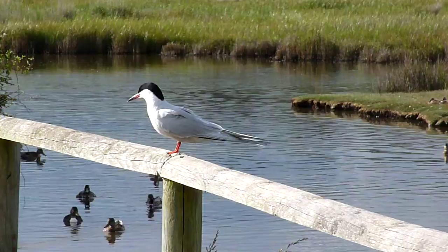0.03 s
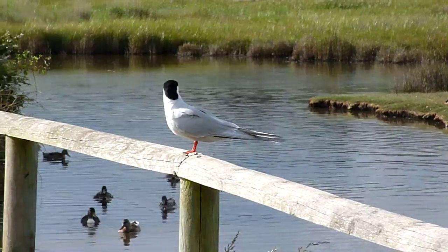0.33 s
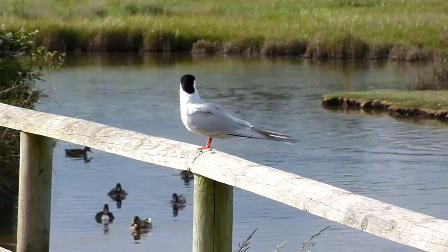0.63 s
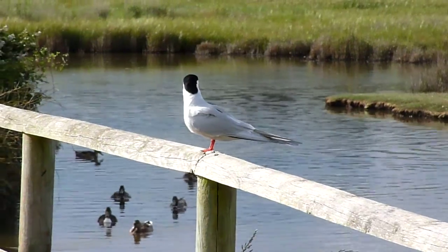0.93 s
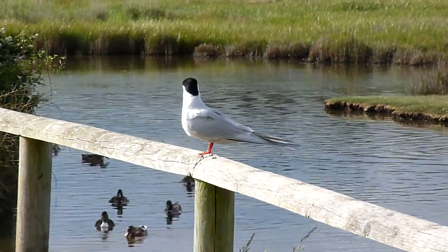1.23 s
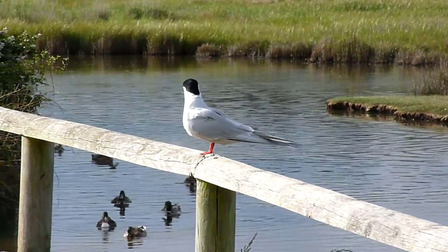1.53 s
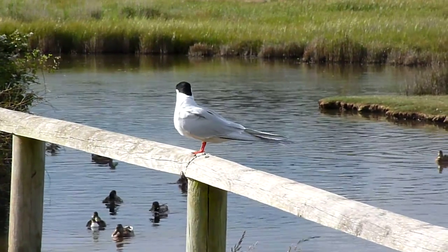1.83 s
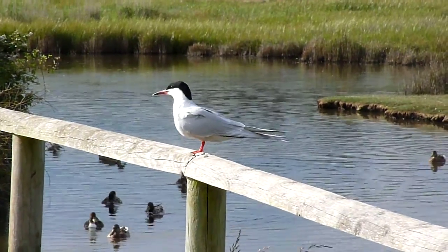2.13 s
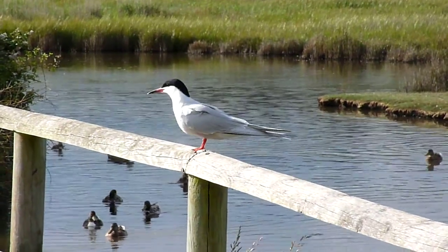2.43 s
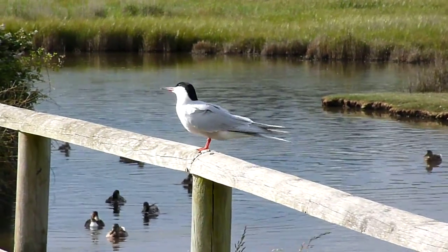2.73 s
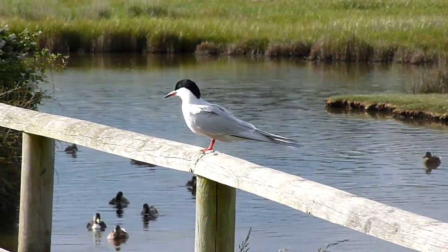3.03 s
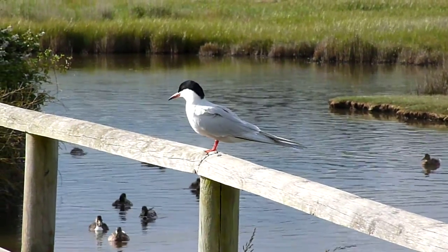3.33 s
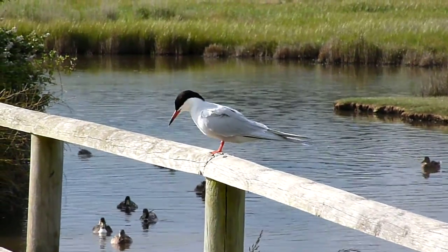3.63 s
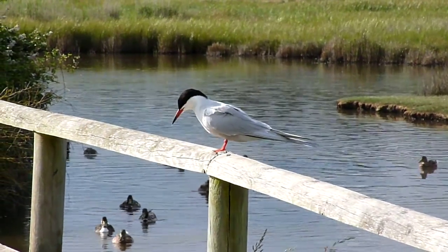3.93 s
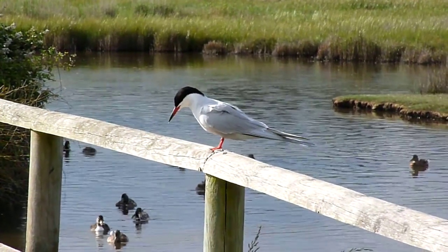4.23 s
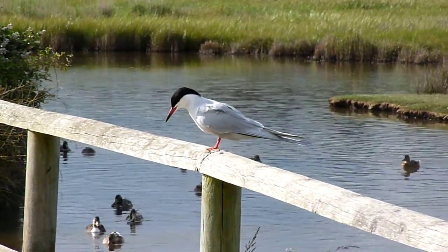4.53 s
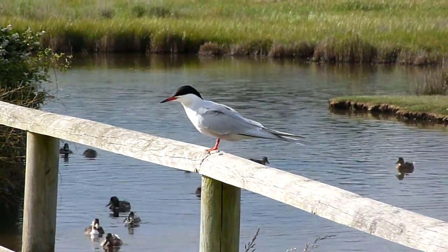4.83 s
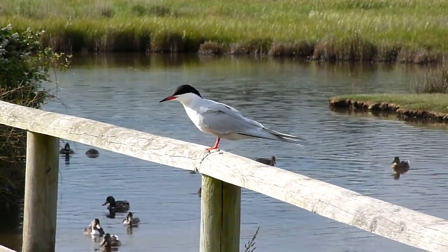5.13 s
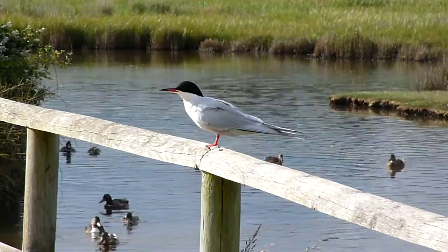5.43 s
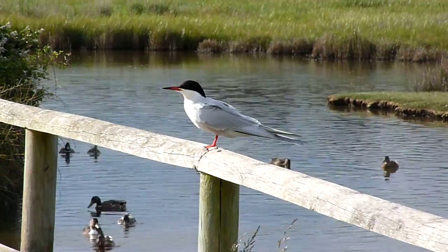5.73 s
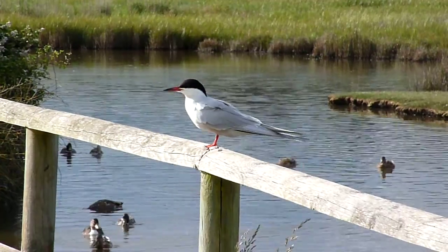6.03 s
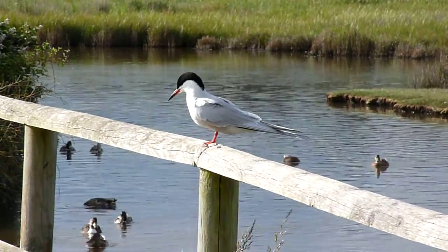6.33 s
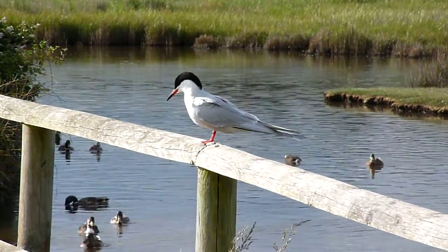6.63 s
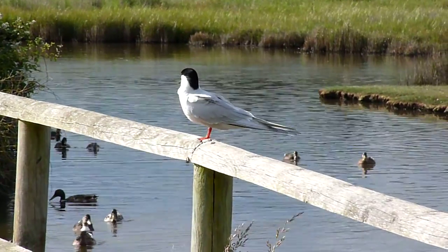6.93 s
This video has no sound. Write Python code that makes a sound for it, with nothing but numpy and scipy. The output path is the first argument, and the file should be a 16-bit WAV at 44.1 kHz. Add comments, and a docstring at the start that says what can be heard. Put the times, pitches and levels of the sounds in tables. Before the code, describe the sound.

Uneven wind buffets the microphone with low rumbling and light crackles, over faint, raspy cries of distant gulls and terns.

```python
"""Beside a pond, gusty wind buffets a microphone; the sound starts about half a second in.
Turbulent pressure rumbles at the port, and hard eddies thump it and make it crackle.
Gulls and terns call across the water, each syrinx a source filtered by throat resonances,
over the hiss of wind in marsh grass. A motor hums briefly near the start; later comes one sharp tick."""
import sys
import numpy as np
from scipy import signal
from scipy.fft import rfft, irfft, next_fast_len
from scipy.io import wavfile
from scipy.ndimage import uniform_filter1d, map_coordinates

SR = 44100
rng = np.random.default_rng(int(sys.argv[2]) if len(sys.argv) > 2 else 0)


def master_out(mix):
    """Clip the mix to full scale and print it as 16-bit PCM to the path in sys.argv[1]."""
    frames = np.transpose(np.atleast_2d(mix))
    ceiling = np.clip(frames, -1, 1)
    pcm = np.round(ceiling * 32767).astype(np.int16)
    wavfile.write(sys.argv[1], SR, pcm)


N = 316197
TIME = np.arange(N) / SR

# The breeze between gusts. Each row: time in seconds, relative level in dB.
BREEZE_LEVELS = [(0.57, -32), (1.3, -29), (1.55, -29.5), (2.05, -32.0), (2.21, -37.5), (2.5, -33),
                 (2.86, -32), (3.04, -35.5), (3.14, -41), (3.5, -30), (3.71, -37), (3.88, -37.0),
                 (4.21, -37), (4.7, -33.5), (5.02, -37), (5.4, -33.5), (7.08, -34), (7.17, -49)]
# Gusts at the port. Each row: start in seconds, length in seconds, relative level in dB,
# rumble and flutter against that level in dB.
PORT_GUSTS = [(.59, .11, -26, -2, -18), (0.782, 0.099, -25, -4, -15), (1.019, 0.036, -26.5, -5.5, -8),
              (1.08, .092, -32.5, -19, -5), (1.179, 0.072, -21, -4, -16), (1.339, .13, -28, -5, -13.5),
              (1.662, 0.085, -26.5, -6, -14), (1.893, 0.058, -23, -5.5, -14), (1.984, 0.054, -27, -13, -9),
              (2.114, 0.046, -25, 6.5, -9), (2.251, .14, -33.5, 3.5, -17), (2.573, .1, -24, -2.5, -12),
              (2.686, .16, -26.5, -4.5, -7), (2.891, .13, -24, -4.5, -16), (3.17, .14, -25.5, 1.5, -11),
              (3.316, 0.099, -26.5, -7, -13), (3.538, 0.048, -25, -4, -8), (3.64, 0.036, -26, -0.5, -7),
              (3.73, 0.16, -28, -0.5, -11), (3.903, 0.1, -24.5, -10, -13), (4.017, .15, -27, -7.5, -16),
              (4.281, 0.029, -26, -3, -14), (4.442, 0.021, -29, -21, -8), (4.63, 0.0351, -27, -3.5, -13),
              (4.697, .163, -26.5, -9, -20), (5.063, 0.059, -26, -2, -12), (5.151, .121, -27.5, -0.5, -9),
              (5.356, 0.12, -26.5, -7, -13), (5.471, 0.096, -24.5, -3, -7), (5.571, .31, -22, -11, -8),
              (5.88, .21, -24, -6.5, -7), (6.185, 0.12, -27.5, -4, -7), (6.308, .17, -23.5, -8.5, -8.5),
              (6.514, .1, -27, -9, -9), (6.673, .12, -26.5, -4, -10.5), (6.873, .17, -23.5, -7, -9)]
# Pressure spectrum of the turbulence at typical speed. Each row: frequency in Hz, relative level in dB.
EDDY_SPECTRUM = [(15, -18), (30, -4.5), (55, 7.5), (115, 7.5), (190, 1.5), (300, -6.5), (450, -20),
                 (700, -34.5), (1100, -51.5), (2000, -76), (4000, -81.5), (10000, -115)]
# The swell of the hiss in the grass. Each row: time in seconds, relative level in dB.
GRASS_LEVELS = [(.57, -56), (.9, -60.5), (1.52, -53), (1.8, -54), (1.92, -62), (2.25, -67.5), (2.55, -58),
                (2.8, -67.5), (3.19, -59.5), (3.3, -66.5), (4.28, -62), (4.45, -55), (4.85, -63.5),
                (5.38, -57), (5.55, -68.5), (6.35, -63.5), (7.17, -67.5)]
# Spectrum of that hiss. Each row: frequency in Hz, relative level in dB.
GRASS_SPECTRUM = [(300, 7.5), (700, 15), (1100, 7.5), (1650, 6), (2200, -2), (3000, -6.5), (4500, -12),
                  (5500, -17.5), (6500, -22.5), (8000, -63)]
# Response of a bird's throat. Each row: frequency in Hz, gain in dB.
THROAT_RESPONSE = [(1000, -24.5), (1600, 0), (2200, 2), (3100, 0), (3900, -3), (4600, -4.5), (5300, -11.5),
                   (6200, -19), (9000, -72.5)]
# Notes of the gull cries. Each row: start, length, climb and fall in seconds; first, crest and end pitch
# in Hz; relative level in dB; offset of the upper resonance at the crest and after the fall in dB;
# brightness of the lower resonance in dB; trill rate in Hz; trill depth at the crest and after the fall,
# 0 to 1; rasp, 0 to 1.
GULL_NOTES = [(0.552, 0.13, 0.013, 0.045, 1492, 1500, 1471, -49.5, 0.5, -8.5, 2, 168, 0.57, 0.76, 0.99),
              (0.689, 0.16, 0.0045, 0.089, 1100, 1101, 1060, -55, -4, -5.5, 5, 65, 0.87, 0.96, 1),
              (0.842, 0.17, 0.077, 0.049, 1006, 1035, 1015, -56, -16, -18, 16, 63.7, 1, 1, 0.57),
              (1.096, 0.16, 0.0047, 0.1, 1570, 1580, 1446, -52, -2.5, -15, 2, 72, 0.78, 0.6, 0.66),
              (1.376, 0.18, .13, 0.036, 1618, 1697, 1680, -58, -11, -1, -4, 59, .25, 0.3, 0.28),
              (1.538, 0.16, 0.0098, 0.098, 1586, 1592, 1460, -53.5, -4, -11, 0, 61, 0.55, 0.7, 0.97),
              (3.38, 0.056, 0.026, 0.028, 1460, 1526, 1495, -65.5, -5, -3, 5, 55.5, 0.14, 0.14, 0.32),
              (3.419, 0.43, .125, .19, 1475, 1598, 1423, -59.5, -6.5, -15, 8.5, 71.7, 0.16, 0.77, 0.33),
              (4.628, 0.34, 0.061, 0.2, 1154, 1197, 1168, -61.5, -15, -9.5, -8.5, 78.3, .6, 0.67, 0.9),
              (5.001, .11, 0.0047, 0.041, 1762, 1755, 1527, -58.5, -11, -15, -7, 98, 0.2, 0.45, 0.29),
              (5.138, 0.074, .025, .04, 1095, 1190, 1170, -61, 0, -2, -3, 93, .6, 0.57, 0.65),
              (5.206, .13, 0.048, 0.068, 1158, 1206, 1060, -57, -13, -4, 1, 92.4, .65, 0.94, 0.26),
              (5.323, .095, .035, 0.035, 1038, 1091, 1035, -53.5, -7, -7, 2, 100, .95, 1, 0.26),
              (5.404, 0.082, .025, .04, 1050, 1070, 1020, -56.5, -8, -3, -3, 110, .95, 0.96, .55),
              (5.729, 0.073, 0.034, .02, 847.7, 915, 900, -60.5, -5, -6, -6, 88.4, .7, .85, .38),
              (5.786, 0.14, 0.053, 0.041, 956, 1145, 1040, -60, -2, -2.5, -5.5, 86.3, 0.56, 0.75, 0.5),
              (6.226, 0.14, 0.023, 0.077, 1093, 1146, 1030, -59.5, -2, -10.5, -14, 88.6, 0.7, 0.68, 0.55),
              (6.352, 0.098, 0.059, .03, 1013, 1064, 1040, -65, -1, -6, -14, 69, 0.7, 0.83, 0.5),
              (7.111, 0.098, 0.052, 0.019, 1127, 1159, 1163, -59.5, -6.5, -10, -15, 92, 0.5, 0.65, 0.92)]
# Reflections from the banks. Each row: delay in seconds, gain in dB.
BANK_REFLECTIONS = [(0.021, -16), (.041, -24), (.067, -18.5), (.103, -23)]
# Grating calls. Each row: start and length in seconds, relative level in dB,
# first centre, last centre and width of the resonance in Hz.
GRATING_CALLS = [(0.572, 0.115, -56.5, 4620, 4550, 380), (1.447, 0.13, -56.5, 2244, 2240, 260.1),
                 (1.731, 0.09, -54, 1903, 1720, 1385), (2.065, 0.082, -56, 1701, 1551, 900.3),
                 (2.54, 0.052, -65.5, 3790, 3980, 499.6), (3.831, 0.044, -59.5, 2498, 2005, 1102),
                 (3.939, .04, -58.5, 2720, 2102, 1290), (4.067, .072, -55, 3750, 3410, 1689),
                 (4.144, 0.084, -56, 3052, 2742, 911), (4.221, 0.067, -59, 2957, 3160, 997.7)]
# The swell of the motor. Each row: time in seconds, gain in dB.
MOTOR_SWELL = [(.6, -7.5), (1.0, -10), (1.15, 2), (1.7, -3.5), (1.85, -4), (2.0, -56)]
# Partials of the motor. Each row: frequency in Hz, level before the swell in dB.
MOTOR_PARTIALS = [(322, -44), (403.5, -42), (483, -55), (564.5, -49), (705, -56), (963.6, -65)]
# Shrill tern notes. Each row: start and length in seconds, top and last pitch in Hz, level in dB,
# boost of the upper band in dB.
TERN_SQUEAKS = [(1.079, .022, 1808, 1669, -52, 27), (1.299, 0.028, 1628, 1448, -59, 4),
                (2.516, 0.036, 1621, 1698, -68.5, 8), (2.562, .032, 1699, 1479, -57, 6),
                (3.097, .025, 1820, 1801, -70, 9), (6.312, 0.036, 2050, 1750, -69, 13)]
# Harsh, clipped tern notes. Each row: start in seconds, relative level in dB, centre frequency in Hz.
TERN_RATTLES = [(.771, -52, 3913), (1.239, -46.5, 3840), (1.338, -49, 3750), (1.434, -57, 3686),
                (3.628, -61.5, 4200), (3.663, -57.5, 3698), (3.741, -52.5, 3320), (3.893, -65, 4700),
                (4.012, -60, 4738), (6.066, -64, 4567), (6.151, -65, 4415), (6.253, -61, 4090)]
# Single hard eddies. Each row: time in seconds, relative peak in dB, strongest frequency in Hz.
HARD_EDDIES = [(.81, -8, 198), (.825, -10, 200), (.872, -13, 150), (1.024, -12, 259.8), (1.356, -15, 125.1),
               (1.621, -13, 160.1), (1.679, -13, 175), (1.824, -13, 177.7), (1.931, -11, 220.3),
               (1.992, -12, 226.1), (2.143, -11, 252.2), (2.149, -11, 332), (2.596, -9.5, 270),
               (2.701, -18, 320.1), (2.714, -13.5, 170), (2.771, -20.5, 379.5), (2.79, -18, 319.2),
               (2.986, -14, 250.3), (3.094, -13.5, 150.7), (3.209, -13, 240.7), (3.241, -16, 320),
               (3.281, -16.5, 323), (3.389, -11.5, 200), (3.561, -8.5, 220), (3.583, -9, 199.9),
               (3.648, -14.5, 369.1), (3.669, -13, 220.1), (3.975, -15, 160.7), (4.326, -11.5, 229.9),
               (4.574, -9.5, 214.8), (4.649, -13.5, 207.4), (5.08, -7.5, 289.5), (5.113, -11.5, 199.3),
               (5.309, -12.5, 171), (5.486, -10.5, 249), (5.519, -12.5, 320), (5.546, -14.5, 229.7),
               (5.592, -11, 280), (5.688, -13, 279.7), (5.726, -14.5, 249.8), (5.767, -15, 320),
               (5.804, -13, 288), (5.846, -17, 411), (5.908, -11.5, 229.9), (5.986, -12.5, 300.6),
               (6.059, -13.5, 321), (6.136, -11, 190), (6.193, -13.5, 209.9), (6.259, -7.5, 194.6),
               (6.339, -14, 280), (6.361, -11, 159.6), (6.44, -16.5, 319.8), (6.507, -23, 399.6),
               (6.57, -16.5, 399.6), (6.599, -18, 439.3), (6.61, -18.5, 350.2), (6.92, -13.5, 199.1),
               (6.959, -12.5, 259.1)]
# Lone crackles of the microphone. Each row: time in seconds, level before filtering in dB.
LONE_CRACKLES = [(1.816, -27.5), (1.894, -35), (2.126, -42), (2.444, -39), (2.625, -36), (2.64, -40.5),
                 (3.21, -29), (4.424, -30), (6.731, -35), (6.903, -38), (6.946, -41)]


def from_db(db):
    """Amplitude grows tenfold with every 20 dB."""
    return 10 ** (np.asarray(db) / 20)


def unit_rms(x):
    """Normalisation to an rms of 1."""
    return x / np.sqrt(np.mean(x ** 2) + 1e-20)


def in_time(rows):
    """Linear interpolation of a curve at every sample."""
    return np.interp(TIME, *np.transpose(rows))


def at_hz(spectrum, hz):
    """Interpolation of a spectrum on a logarithmic frequency axis."""
    known_hz, db = np.transpose(spectrum)
    return np.interp(np.log(np.maximum(hz, 1)), np.log(known_hz), db)


def coloured(spectrum, size=N):
    """Spectral shaping of white noise, to an rms of 1."""
    hz = np.linspace(0, SR / 2, next_fast_len(size) + 1)
    white = rfft(rng.standard_normal(2 * len(hz) - 2))
    return unit_rms(irfft(white * from_db(at_hz(spectrum, hz)))[:size])


def drift(rate_hz):
    """Low-passed noise wanders smoothly at about the given rate, with an rms of 1."""
    pole = np.exp(-2 * np.pi * rate_hz / SR)
    return unit_rms(signal.lfilter([1], [1, -2 * pole, pole * pole], rng.standard_normal(N + SR))[SR:])


def band(x, low_hz, high_hz, order=2):
    """A maximally flat band-pass filter."""
    sos = signal.butter(order, [low_hz, min(high_hz, .45 * SR)], "band", fs=SR, output="sos")
    return signal.sosfilt(sos, x + 1e-18)


def split(x, hz):
    """Complementary filtering: the parts below and above a frequency sum to the whole."""
    low = signal.sosfiltfilt(signal.butter(4, hz, fs=SR, output="sos"), x)
    return low, x - low


def evened(x, span_s):
    """Division by the running rms holds the level steady."""
    size = max(int(span_s * SR), 8)
    power = uniform_filter1d(uniform_filter1d(x * x, size), size)
    return x / np.sqrt(np.abs(power) + 1e-14)


def ramp(age, length_s):
    """A linear rise from 0 to 1 that then holds."""
    return np.clip(age / max(length_s, 1e-4), 0, 1)


def gust_levels(attack_s=.007, release_s=.009, sag_db_per_s=9.5):
    """Incoherent powers add: breeze plus gusts sets the dB levels of large, middling and small eddies."""
    breeze_balance = from_db([[-3], [0], [-13]])   # rumble, body, flutter
    power = (from_db(in_time(BREEZE_LEVELS)) * breeze_balance) ** 2
    for start, length, db, rumble_db, flutter_db in PORT_GUSTS:
        span = slice(int(start * SR), int((start + length + 10 * release_s) * SR))
        age = TIME[span] - start
        release = np.exp(-np.maximum(age - length, 0) / release_s)
        swell = ramp(age, attack_s) * from_db(db - sag_db_per_s * age) * release
        power[:, span] += (swell * from_db([[rumble_db], [0], [flutter_db]])) ** 2
    return 10 * np.log10(power)


def wind(jitter_db=1.4461, speed_exponent=.4556, pressure_exponent=1.27, spike_exponent=.08):
    """Frozen turbulence is carried past the port: faster air raises its pitch and presses harder."""
    rumble_db, body_db, flutter_db = gust_levels()
    jitter = jitter_db * np.clip(drift(60), -2.5, 2.5)
    speed = from_db(speed_exponent * (flutter_db - np.median(flutter_db)) + jitter)
    field = coloured(EDDY_SPECTRUM, size=2 * N)
    pressure = map_coordinates(field, [np.cumsum(speed)], order=3, mode="wrap")
    pressure *= from_db(pressure_exponent * jitter)
    rumble, rest = split(pressure, hz=110)
    body, flutter = split(rest, hz=330)
    flutter *= from_db(spike_exponent * jitter)   # the smallest eddies come in the sharpest bursts
    return (from_db(rumble_db - 1) * evened(rumble, span_s=.12)
            + from_db(body_db - 1.5) * evened(body, span_s=.048)
            + from_db(flutter_db - 1.5) * evened(flutter, span_s=.031))


def grass(gain_db=6.5):
    """Filtered noise: a broad background hiss that swells and sinks, dipping after loud gusts."""
    return from_db(in_time(GRASS_LEVELS) + gain_db) * coloured(GRASS_SPECTRUM)


def syrinx(pitch):
    """Source and filter: the throat weights each harmonic of a gliding pitch."""
    phase = 2 * np.pi * np.cumsum(pitch) / SR
    return sum(from_db(at_hz(THROAT_RESPONSE, k * pitch)) * np.sin(k * phase) for k in range(1, 8))


def gull_contours(swell_db=6.5, fade_db=5.5, fade_drop_hz=44.95, attack_s=.0067, release_s=.027):
    """Slow modulation: a note climbs and swells, falls in pitch, then sinks and roughens as it fades."""
    controls, sounding = np.zeros((7, N)), np.zeros(N)
    edges = [0] + [int(note[0] * SR) for note in GULL_NOTES[1:]] + [N]   # overlapping notes are slurred
    for note, span in zip(GULL_NOTES, map(slice, edges, edges[1:])):
        (start, length, climb_s, fall_s, first_hz, crest_hz, end_hz, db, crest_upper_db, end_upper_db,
         bright_db, trill_hz, crest_depth, end_depth, rasp) = note
        age = TIME[span] - start
        climbed = np.sin(np.pi / 2 * ramp(age, climb_s))
        fallen = np.sin(np.pi / 2 * ramp(age - climb_s, fall_s)) ** 2
        faded = ramp(age - climb_s - fall_s, length - climb_s - fall_s) ** 2
        settled = ramp(age - climb_s, .61 * fall_s)
        pitch = first_hz + (crest_hz - first_hz) * climbed + (end_hz - crest_hz) * fallen
        pitch -= fade_drop_hz * faded
        lower_db = db - swell_db * (1 - climbed) - fade_db * faded
        upper_db = lower_db + crest_upper_db + (end_upper_db - crest_upper_db) * settled
        depth = crest_depth + (end_depth - crest_depth) * fallen ** 3.3   # changes late in the fall
        controls[:, span] = np.broadcast_arrays(
            pitch, lower_db, upper_db, bright_db, depth, rasp + .3 * faded, trill_hz)
        sounding += ramp(TIME - start, attack_s) * ramp(start + length - TIME, release_s)
    return (*controls, np.minimum(sounding, 1))


def trill_arches(rate_hz, stumble):
    """A rectified sine gives one arch a beat; random frequency modulation makes the beats stumble."""
    beats = np.cumsum(rate_hz * (1 + stumble * drift(45))) / SR
    return np.abs(np.sin(np.pi * beats))


def gulls(rasp_bend=.072, rasp_hz=700):
    """A fast trill modulates each cry's pitch and amplitude; chaos in the syrinx makes it screech."""
    pitch, lower_db, upper_db, bright_db, depth, rasp, trill_hz, sounding = gull_contours()
    depth, rasp = np.clip(depth, 0, 1), np.clip(rasp, 0, 1)
    # the hoarser the cry, the more its beats vary in timing and strength
    arch = trill_arches(trill_hz, stumble=.16 * rasp)
    force = from_db(2 * rasp * drift(70))
    bend = .25 * depth ** 2 * (arch - .8) + rasp_bend * rasp * drift(rasp_hz)
    tone = np.sqrt(1 - rasp ** 2 / 2) * evened(syrinx(pitch * (1 + bend)), span_s=.03)
    screech = .9 * rasp ** 1.3 * coloured(THROAT_RESPONSE)
    voice = (tone + screech) * force * (1 - depth + depth * arch ** 2)
    # the two throat resonances swell separately as the bill opens and closes
    lower, upper = split(voice, hz=3900)
    dark, bright = split(lower, hz=2650)
    lower = dark * from_db(-bright_db / 2) + bright * from_db(bright_db / 2)
    return sounding * (from_db(lower_db - .7) * evened(lower, span_s=.026)
                       + from_db(upper_db - 4.5) * evened(upper, span_s=.033))


def with_bank_echoes(x):
    """Reflection: the banks add faint, delayed copies to the direct sound."""
    return x + sum(from_db(db) * np.interp(TIME - delay, TIME, x) for delay, db in BANK_REFLECTIONS)


def grating_calls(depth=.75, rise_s=.008, fall_s=.0044, sag_db_per_s=30, screech_db=-12):
    """Amplitude modulation chops the noise of a sliding throat resonance and a broader screech."""
    arch = trill_arches(rate_hz=82, stumble=.22)
    beats = unit_rms(1 - depth + depth * arch ** 2)
    screech = from_db(screech_db) * coloured(THROAT_RESPONSE)
    calls = np.zeros(N)
    for start, length, db, first_hz, last_hz, width_hz in GRATING_CALLS:
        span = slice(int(start * SR), int((start + length) * SR))
        age = TIME[span] - start
        sos = signal.butter(2, width_hz / 2, fs=SR, output="sos")
        in_phase, quadrature = signal.sosfilt(sos, rng.standard_normal((2, SR // 2)))[:, -len(age):]
        phase = 2 * np.pi * np.cumsum(first_hz + (last_hz - first_hz) * age / length) / SR
        resonance = evened(in_phase * np.cos(phase) + quadrature * np.sin(phase), span_s=.0054)
        envelope = from_db(db - sag_db_per_s * age) * ramp(age, rise_s) * ramp(length - age, fall_s)
        calls[span] += envelope * (resonance + screech[span])
    return split(beats * calls, hz=5800)[0]


def motor(waver=.0017):
    """A line spectrum: the motor's nearly steady partials waver together, swell and die away."""
    phase_per_hz = 2 * np.pi * np.cumsum(1 + waver * drift(12)) / SR
    hum = sum(np.sqrt(2) * from_db(db) * np.sin(hz * phase_per_hz + 2 * np.pi * rng.random())
              for hz, db in MOTOR_PARTIALS)
    return from_db(in_time(MOTOR_SWELL)) * hum


def tern_rattles(rise_s=.0047, band_ratio=1.38, rattle_hz=205):
    """Amplitude modulation roughens brief bursts of throat noise into harsh, clipped notes."""
    rasp, notes = coloured(THROAT_RESPONSE), np.zeros(N)
    for start, db, hz in TERN_RATTLES:
        rattle = np.sin(np.pi * rattle_hz * (TIME - start)) ** 2
        rise = np.clip((TIME - start) / rise_s, 0, 50)
        envelope = (rise * np.exp(1 - rise)) ** 2
        notes += from_db(db) * envelope * unit_rms(band(rasp * rattle, hz / band_ratio, hz * band_ratio))
    return notes


def buffets(gain_db=-.54):
    """A hard eddy is one swing of pressure: the shorter the pulse, the wider its spectrum."""
    thumps = np.zeros(N)
    for (peak_s, db, hz), turn in zip(HARD_EDDIES, rng.random(len(HARD_EDDIES))):
        span = slice(int((peak_s - .02) * SR), int((peak_s + .02) * SR))
        pulse = (1 - 2j * np.pi * hz * (TIME[span] - peak_s) / 3) ** -4   # its spectrum peaks at hz
        thumps[span] += from_db(db) * np.real(np.exp(2j * np.pi * turn) * pulse)
    return from_db(gain_db) * thumps


def crackle(eddy_offset_db=-26.5, faint_per_s=14, faint_db=-46, spread_db=4.5):
    """Band-limited impulses: the microphone clicks at each hard eddy, singly and in a faint scatter."""
    clicks = (rng.random(N) < faint_per_s / SR) * from_db(faint_db + spread_db * rng.standard_normal(N))
    for time_s, db, _ in HARD_EDDIES:
        clicks[int(time_s * SR)] += from_db(db + eddy_offset_db)
    for time_s, db in LONE_CRACKLES:
        clicks[int(time_s * SR)] += from_db(db)
    clicks *= rng.choice([-1, 1], N)
    return split(band(clicks, 1300, 5400, order=4), hz=6400)[0]


def tern_squeaks(crest_share=.38, leap_hz=378, leap_s=.0018, roughness=.023):
    """Frequency modulation: each shrill note opens with a brief leap in pitch, then follows an arc."""
    quiver, notes = 1 + roughness * drift(800), np.zeros(N)
    for start, length, top_hz, last_hz, db, shrill_db in TERN_SQUEAKS:
        along = np.linspace(0, 1, int(length * SR))
        span = slice(int(start * SR), int(start * SR) + len(along))
        arc = ((along - crest_share) / (1 - crest_share)) ** 2
        pitch = top_hz + (last_hz - top_hz) * arc + leap_hz * np.exp(-along * length / leap_s)
        voice = band(syrinx(pitch * quiver[span]), 2700, 5800, order=4)
        lower, upper = split(voice, hz=4200)
        envelope = np.abs(np.sin(np.pi * along)) ** .3
        notes[span] += from_db(db) * unit_rms((lower + from_db(shrill_db) * upper) * envelope)
    return notes


def tick(start_s=5.4233, peak_db=-20, decay_s=.0017):
    """A pressure step with exponential decay is broadband: one dry, bright tick."""
    age = TIME - start_s
    return from_db(peak_db) * (age >= 0) * np.exp(-np.abs(age) / decay_s)


def scene():
    """Superposition: wind and small noises at the port in front, marsh and birds behind."""
    near = wind() + buffets() + crackle() + motor() + tick()
    far = grass() + with_bank_echoes(gulls() + tern_squeaks() + tern_rattles() + grating_calls())
    return (near + far)[None]


def record(dry, open_s=.569, hiss_db=-101, cutoff_hz=17200):
    """Soft saturation: the microphone opens, rounds the peaks, adds faint hiss and cuts the top treble."""
    opened = ramp(TIME - open_s, .003)
    sound = opened * (.84 * np.tanh(dry / .75) + from_db(hiss_db) * rng.standard_normal(N))
    return signal.sosfilt(signal.cheby2(12, 70, cutoff_hz, fs=SR, output="sos"), sound)


dry = scene()
out = record(dry)
master_out(out)
```